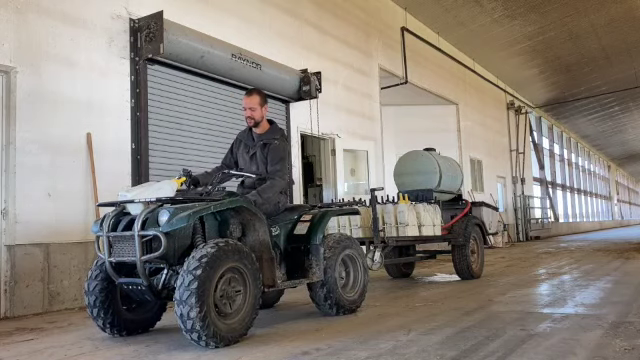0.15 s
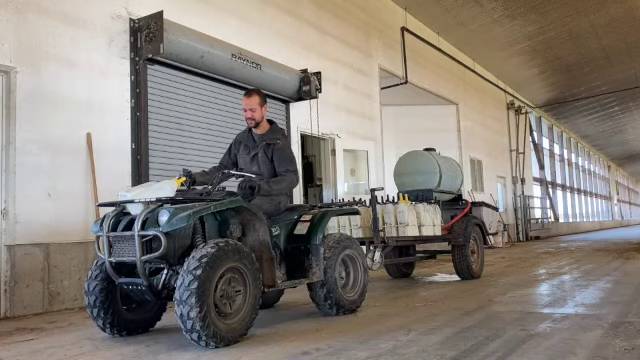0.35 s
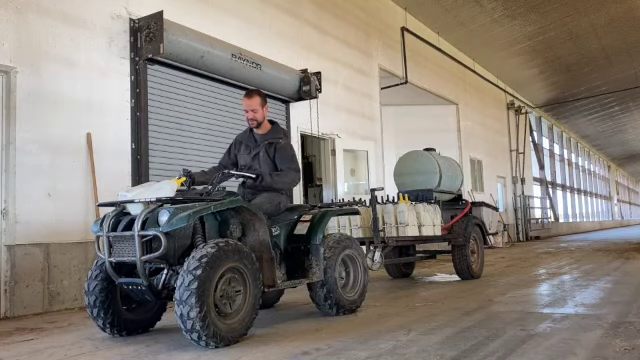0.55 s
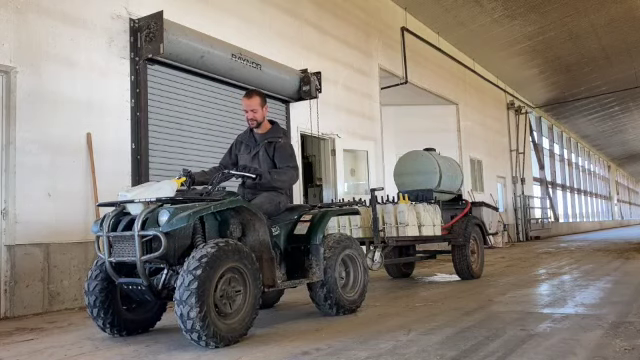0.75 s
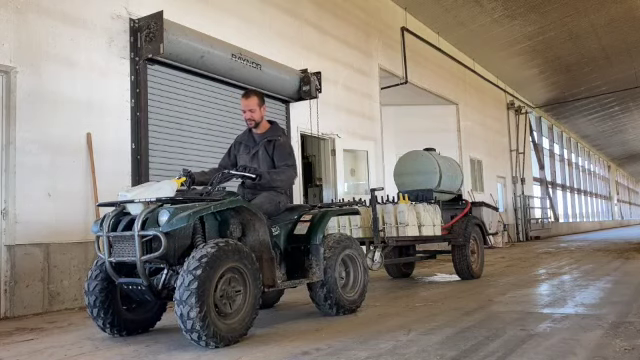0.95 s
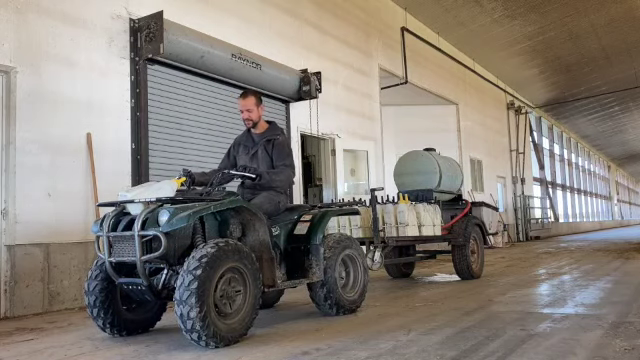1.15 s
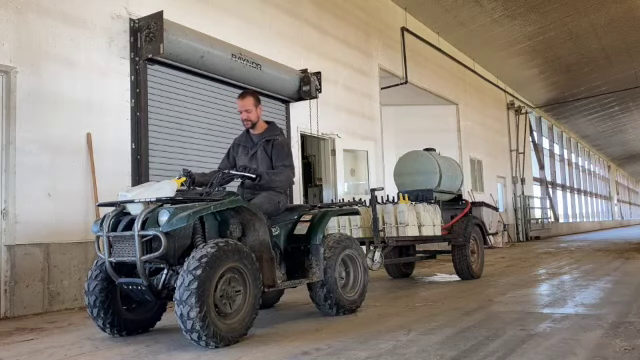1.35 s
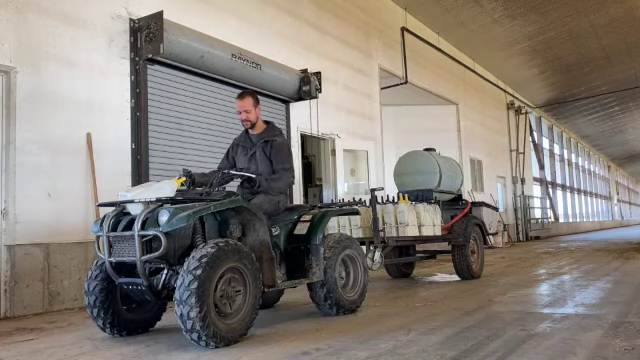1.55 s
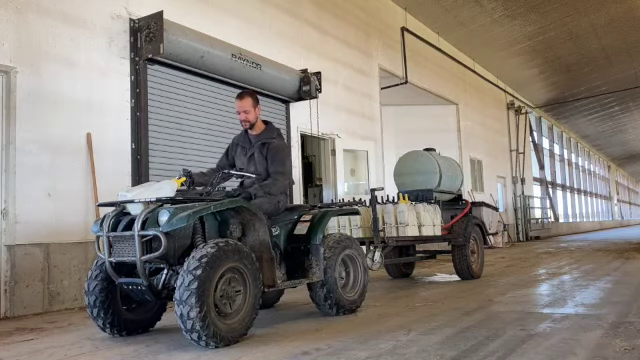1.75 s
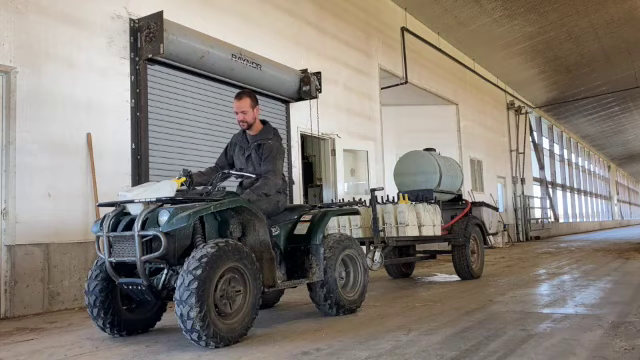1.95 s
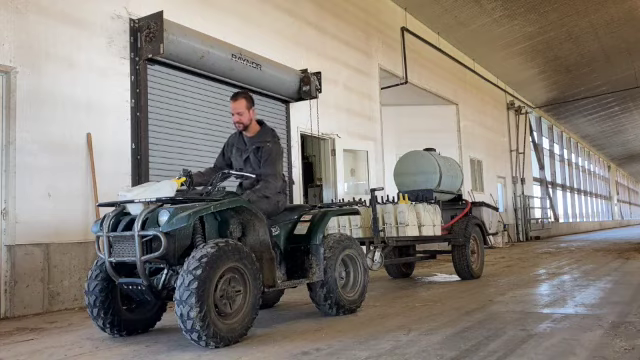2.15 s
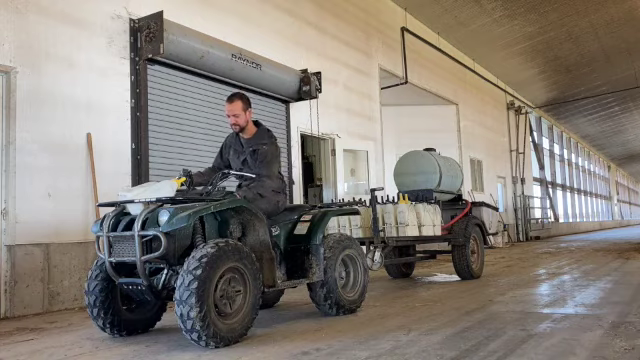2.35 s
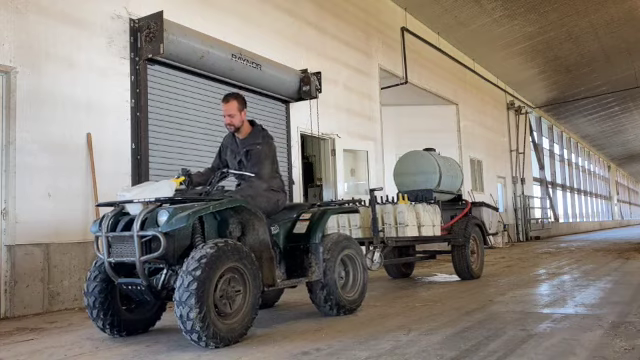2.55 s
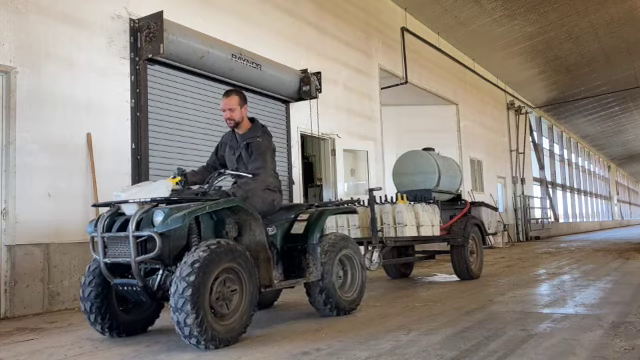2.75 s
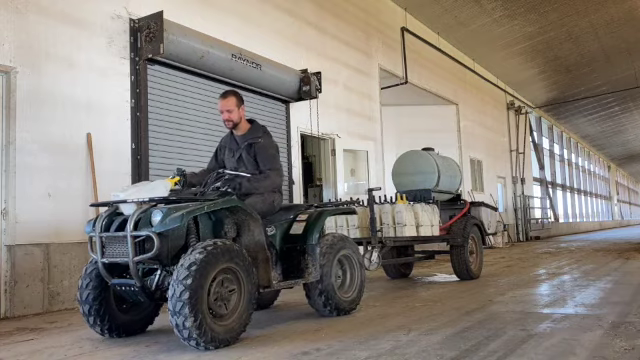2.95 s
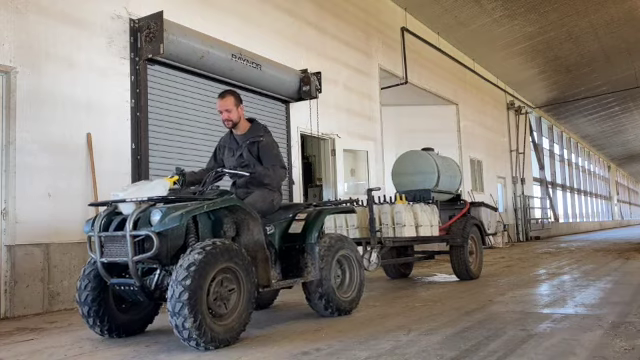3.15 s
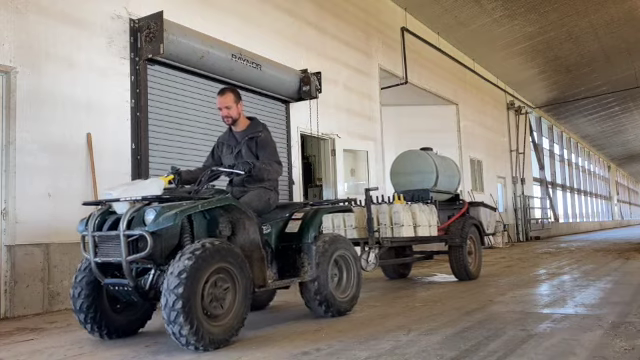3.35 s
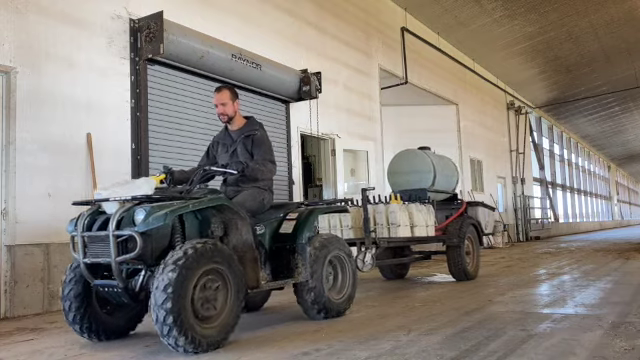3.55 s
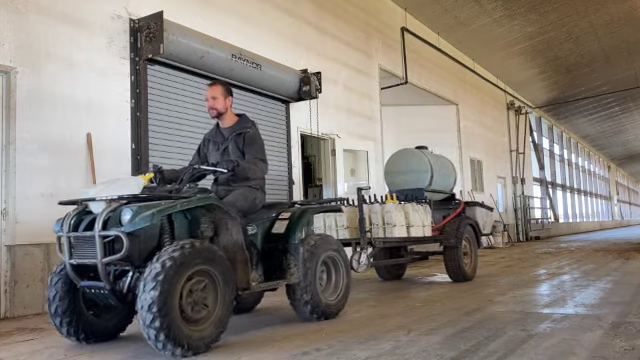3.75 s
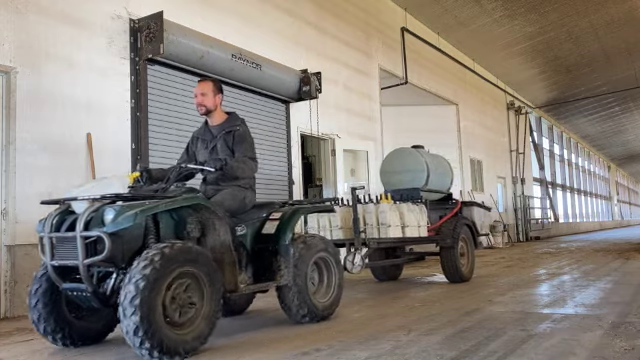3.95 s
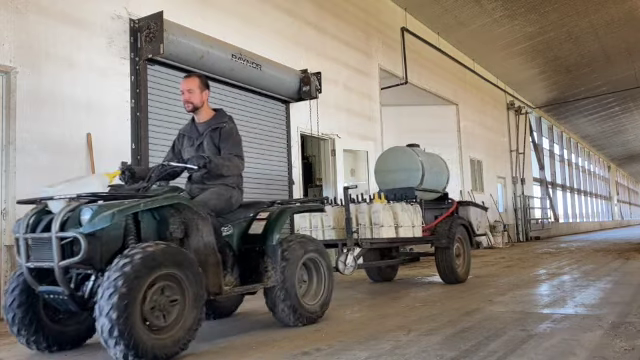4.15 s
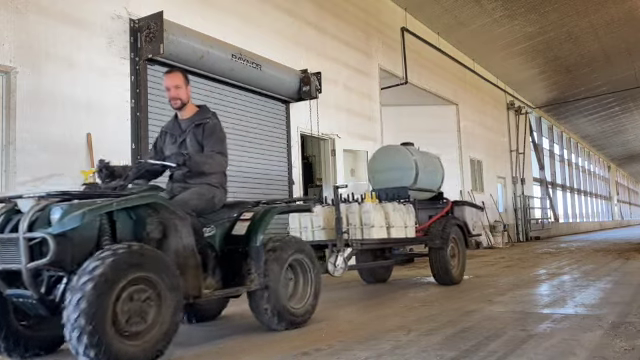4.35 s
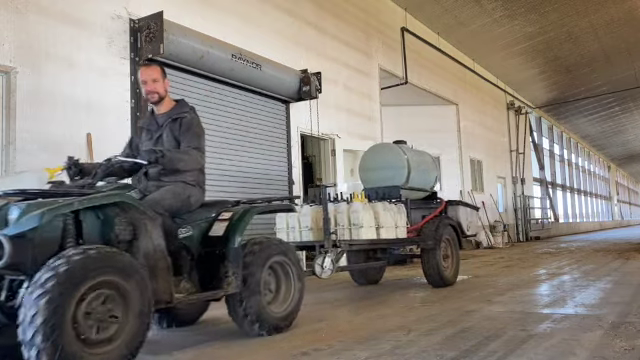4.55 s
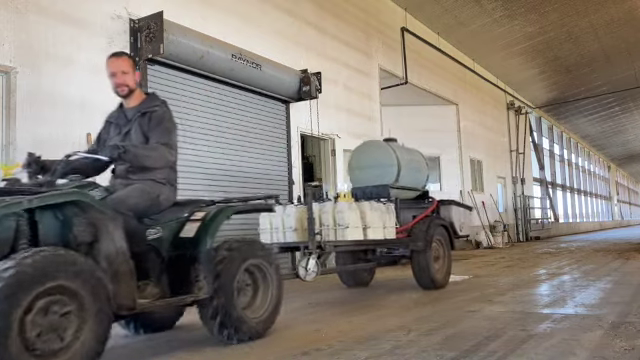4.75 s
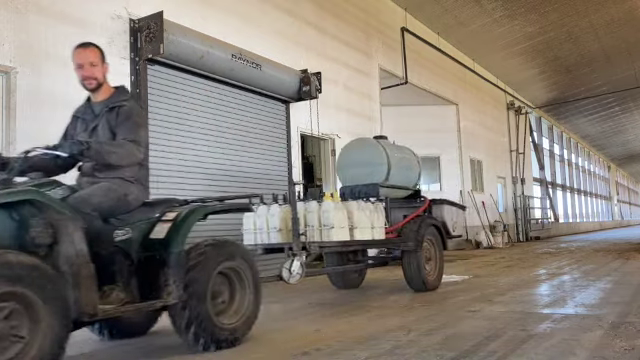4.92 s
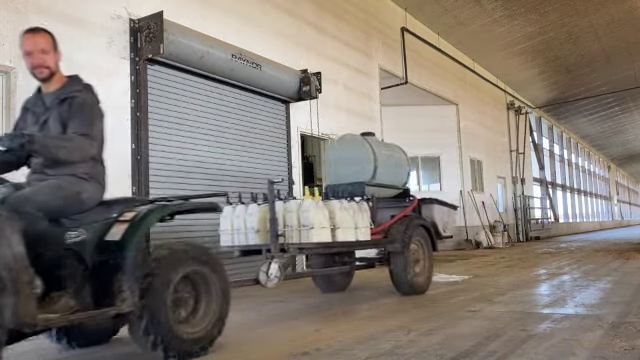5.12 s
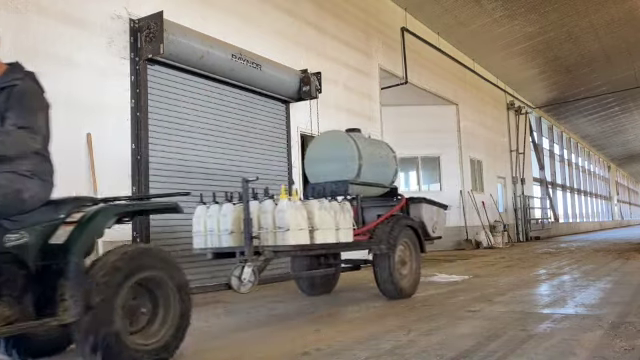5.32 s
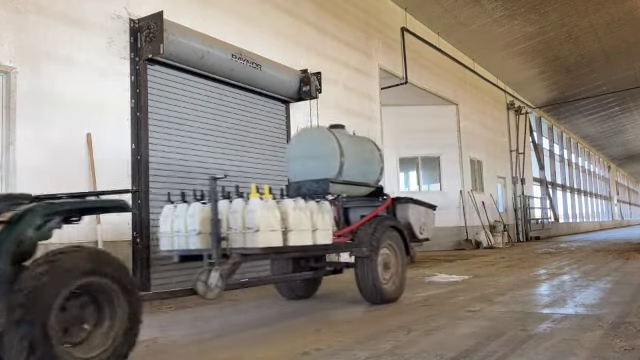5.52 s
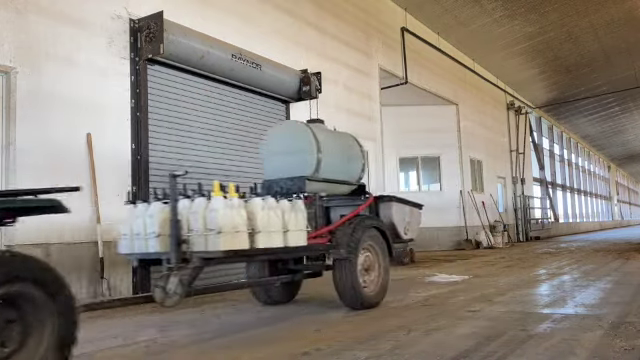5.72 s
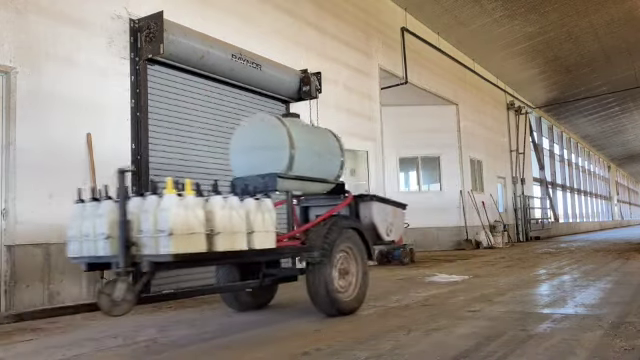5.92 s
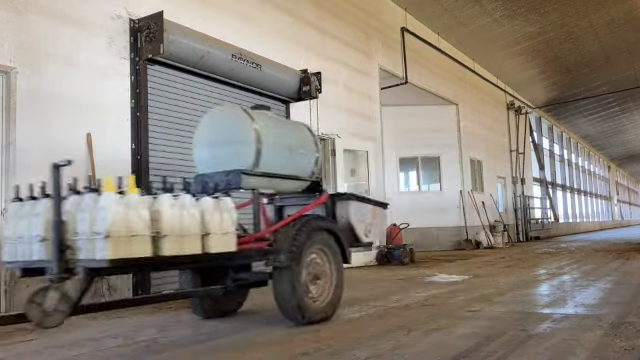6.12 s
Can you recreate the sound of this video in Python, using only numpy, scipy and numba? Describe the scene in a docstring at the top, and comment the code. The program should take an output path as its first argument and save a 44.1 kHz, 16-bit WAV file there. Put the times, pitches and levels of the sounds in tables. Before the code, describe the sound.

Inside a long concrete barn, heard by a nearby stereo phone, a low wavering machinery hum and soft air rush open the scene. Metallic frame knocks fall around 0.2 and 0.5-0.6 s. At 0.9 s a bright relay click is followed by a short, rough starter grind, swelling near 1.0 and letting go by 1.15 as a small single-cylinder engine catches. It flares until about 1.4 with gear chatter and several hard clacks, then sinks to a slow, lumpy, thumping idle with ticking valves and a few knocks, almost stalling near 2.7. Two strong clunks at 2.8-2.9 mark the load coming on. The boomy exhaust firms to about twenty beats per second, rising past thirty by 6 s. Valve ticking gives way to casing clatter and hiss as the flank passes after 4 s; around 5.6 the tail passes, the tailpipe rings out and trailer rattle peaks near 5.9, leaving leftward.

```python
"""Long concrete barn: a single-cylinder four-stroke quad is started, idles, and pulls a trailer past a phone.
First come humming machinery (shaped noise), frame knocks (struck modes), relay click and starter grind.
Each firing pops, rings the tailpipe and swells in the silencer (pulses through resonators).
Valves tick (filtered clicks); casing and gas throb each cycle (shaped noise).
The trailer rattles (random knocks on resonances)."""
import sys
import numpy as np
from scipy import signal
from scipy.fft import rfft, irfft, next_fast_len
from scipy.io import wavfile
from scipy.ndimage import uniform_filter1d
from numba import njit

SR = 44100
rng = np.random.default_rng(int(sys.argv[2]) if len(sys.argv) > 2 else 0)


def attenuation_scalar(level_db):
    """Turn a level in dB into a linear amplitude multiplier (20 dB per decade)."""
    decades = np.asarray(level_db, float) / 20
    return 10 ** decades


def wav_out(sig):
    """Save sig, one row per channel (or a flat mono array), as 16-bit PCM at SR to the path in sys.argv[1]."""
    wavfile.write(sys.argv[1], SR, np.round(np.clip(np.atleast_2d(sig).T, -1, 1) * 32767).astype(np.int16))


N = 272538
SIZE = next_fast_len(N)
T = np.arange(N) / SR
F = np.maximum(np.fft.rfftfreq(SIZE, 1 / SR), 1)


def unit(x):
    """Scale to rms 1."""
    return x / np.sqrt(np.mean(x ** 2))


def curves(table):
    """Columns of a table, interpolated over time."""
    s, *columns = np.transpose(table)
    return [np.interp(T, s, c) for c in columns]


@njit
def svf(x, hz, width_hz):
    """State-variable band-pass with a moving centre, gain 1 there."""
    y, b, l = np.empty(len(x)), 0., 0.
    for i in range(len(x)):
        g, k = np.tan(np.pi * hz[i] / SR), width_hz / hz[i]
        v = (b + g * (x[i] + 1e-18 - l)) / (1 + g * (g + k))
        b, l, y[i] = 2 * v - b, l + 2 * g * v, k * v
    return y


def band(x, hz, width_hz):
    """Band-pass at a fixed or moving centre."""
    return svf(x, hz + np.zeros(N), float(width_hz))


def noise(points=(), peaks=()):
    """Two unrelated noises, rms 1, coloured by (Hz, dB) points or (Hz, width Hz, dB) resonances."""
    if points:
        hz, db = np.transpose(points)
        gain = attenuation_scalar(np.interp(np.log(F), np.log(hz), db))
    else:
        power = sum(attenuation_scalar(db) ** 2 / (1 + ((F - hz ** 2 / F) / w) ** 2) ** 2 for hz, w, db in peaks)
        gain = np.sqrt(power)
    white = rng.standard_normal((2, SIZE))
    return unit(irfft(gain * rfft(white), SIZE)[:, :N])


def walk(rate_hz):
    """Random levels, rms 1, held 1 / rate_hz s and slewed twice."""
    k = int(SR / rate_hz)
    held = np.repeat(rng.standard_normal(N // k + 1), k)
    return unit(uniform_filter1d(uniform_filter1d(held, k), k)[:N])


def ring(modes, start_s):
    """Struck modes (Hz, dB, t60 s), each a little detuned from blow to blow."""
    out, first = np.zeros(N), int(start_s * SR)
    t = T[:min(SR // 3, N - first)]
    detune = 1 + 0.034 * rng.standard_normal(len(modes))
    for (hz, db, t60_s), d in zip(modes, detune):
        decay = np.exp(-np.log(1000) * t / t60_s)
        out[first:first + len(t)] += attenuation_scalar(db) * np.sin(2 * np.pi * hz * d * t) * decay
    return out / np.sqrt(len(modes))


def scatter(x, t60_s, wet_db):
    """Near sound plus its scattered echo off floor and walls, as two unrelated versions."""
    t = T[:int(t60_s * SR)]
    tails = rng.standard_normal((2, len(t))) * np.exp(-np.log(1000) * t / t60_s)
    tails *= attenuation_scalar(wet_db) / np.sqrt(np.sum(tails[0] ** 2))
    direct = x * np.array([[1], [0]])
    return direct + signal.fftconvolve(x[None], tails, axes=1)[:, :N]


def peak(at_s, top_db, rise_db_per_s, fall_db_per_s):
    """Level in dB that climbs to one moment and falls away after it."""
    return top_db - np.where(T < at_s, rise_db_per_s * (at_s - T), fall_db_per_s * (T - at_s))


# barn machinery; swells, then drops just before the engine catches: [t/s, hum level/dB, air level/dB]
MACHINERY_LEVELS = [(0, -26.5, -25.5), (.9, -26, -27), (1.06, -25.5, -21.5), (1.095, -16, -17),
                    (1.12, -30, -37), (1.2, -44, -39), (6.18, -27, -31)]
# hum resonances: [f/Hz, width/Hz, level/dB]
HUM_PEAKS = [(54, 5, -5), (66, 5, 0), (124, 6, -4), (180, 8, -9), (4150, 1000, -35), (3871, 15, -30)]
# air rush spectrum: [f/Hz, level/dB]
AIR_SPECTRUM = [(15, -35), (30, -16), (70, 1), (185, -13.5), (416, -17), (900, -23), (2300, -31.5),
                (3200, -34), (4200, -43), (5500, -42.5), (9000, -46.5), (16000, -58.5)]


def barn():
    """Machinery: narrow noise bands make a wavering hum, broad noise a rush of air."""
    hum_db, air_db = curves(MACHINERY_LEVELS)
    hum = attenuation_scalar(hum_db) * noise(peaks=HUM_PEAKS)
    air = attenuation_scalar(air_db + 0.64 * walk(7.5)) * noise(points=AIR_SPECTRUM)
    return hum + air


CRUNCH_DB, CRUNCH_T60_S = -13, 0.079  # loose parts jolted by a blow; dB relative to the blow
# blows on the frame: [t/s, level/dB, f/Hz that rings most, thud level/dB]
FRAME_BLOWS = [(.188, -14, 2220, -39), (0.198, -44, 1500, -7), (.213, -27, 2200, -8),
               (0.237, -37, 1500, -14), (.45, -22, 560, -38), (.5, -23, 560, -33), (.577, -21, 860, -26),
               (0.619, -24, 860, -32), (1.253, -15.5, 1090, -37), (1.303, -12, 1320, -9),
               (1.35, -18, 1510, -10.5), (1.397, -16, 2000, -38), (1.44, -19.5, 1500, -25),
               (2.056, -25, 1700, -28), (2.13, -23, 1700, -54), (2.288, -31.5, 2560, -38),
               (2.43, -20, 1550, -36), (2.826, -15, 920, -30), (2.886, -12.5, 940, -16),
               (6.031, -37, 860, -21)]
# frame modes: [f/Hz, level/dB, t60/s]
FRAME_MODES = [(560, 10.5, 0.15), (860, 4, 0.097), (1098, 11, 0.053), (1300, 5, 0.058), (1700, 8, 0.023),
               (2200, 10, 0.023), (2640, 1, 0.012), (3540, 1, 0.042), (4400, 3, 0.027), (6600, 5, 0.014),
               (7750, 11, 0.0099), (10200, 6, 0.0078)]
# low frame modes: [f/Hz, level/dB, t60/s]
THUD_MODES = [(121.2, -3, .13), (192, 4, 0.09), (277, -4.5, 0.22), (329.5, -7, 0.1), (420, -14.5, 0.041)]
# broad metal noise, also under starter and casing: [f/Hz, level/dB]
METAL_SPECTRUM = [(250, -30), (450, -8), (700, 0.5), (1500, 5), (3000, -7.5), (5000, -10.5), (8000, -53)]


def blows():
    """Knocks and clacks: modes near the favoured pitch ring most, over a low thud and a short crunch."""
    hits = 0
    grit = noise(points=METAL_SPECTRUM)[0] * attenuation_scalar(3.3 * walk(300))
    for s, db, top_hz, thud_db in FRAME_BLOWS:
        struck = [(hz, mode_db - 7 * abs(np.log2(hz / top_hz)), t60_s)
                  for hz, mode_db, t60_s in FRAME_MODES]
        decay = (T > s) * np.exp(-np.log(1000) * np.abs(T - s) / CRUNCH_T60_S)
        crunch = attenuation_scalar(CRUNCH_DB) * decay * grit
        hits = hits + attenuation_scalar(db) * (ring(struck, s) + crunch) - attenuation_scalar(thud_db) * ring(THUD_MODES, s)
    return scatter(hits, 0.18, -0.057)


RELAY_S, RELAY_DB = .921, -7.5
GRIND_PEAK_S, GRIND_FREE_S, GRIND_DB, GRIND_TREBLE_DB = 0.99, 1.12, -14.5, -33.5
GRIND_RISE_DB_PER_S, GRIND_FALL_DB_PER_S, TREBLE_SLOPE_SHARE = 270, 146, 0.25
CHATTER_RISE_DB_PER_S, CHATTER_FALL_DB_PER_S = 1500, 397
PINION_S, PINION_DB, PINION_HZ, PINION_SAG_HZ_PER_S = 1.14, -21, 1500, 9400
PINION_RISE_DB_PER_S, PINION_FALL_DB_PER_S, PINION_LENGTH_S = 1500, 150, .06
# relay modes: [f/Hz, level/dB, t60/s]
RELAY_MODES = [(1780, 0, 0.02), (3410, 10, 0.018), (6070, -9, 0.027), (6570, -3, 0.023), (7700, 0, 0.016),
               (10800, 2.5, 0.0089)]
# starter body resonances: [f/Hz, width/Hz, level/dB]
STARTER_PEAKS = [(607, 184, 4.5), (1080, 300, -3), (1380, 130, 4), (1667, 70, 3.5), (2090, 740, -2.5),
                 (2740, 320, -2), (3200, 360, -7), (3970, 210, -29)]
# gear chatter as the engine overruns it: [t/s, body level/dB, treble level/dB]
GEAR_CHATTER = [(1.138, -32, -37), (1.201, -29, -28.5), (1.27, -28.5, -31), (1.325, -24.5, -29),
                (1.371, -27, -31.5), (1.418, -26, -33.5), (1.47, -40, -45)]
# hiss, as starter treble and as engine gas: [f/Hz, level/dB]
HISS_SPECTRUM = [(1500, -28), (4000, -5), (6000, -2.5), (9000, -3.5), (12000, -5), (16000, -16)]


def starter():
    """Relay snaps shut, motor grinds on the ring gear and lets go, freed pinion runs down."""
    swell_db = peak(GRIND_PEAK_S, 0, GRIND_RISE_DB_PER_S, GRIND_FALL_DB_PER_S)
    swell_db = np.where(T > RELAY_S, swell_db, -200)
    swell_db = swell_db - 200 * (T > GRIND_FREE_S)
    body = attenuation_scalar(GRIND_DB + swell_db)
    treble = attenuation_scalar(GRIND_TREBLE_DB + TREBLE_SLOPE_SHARE * swell_db)
    for s, db, treble_db in GEAR_CHATTER:
        burst = attenuation_scalar(peak(s, 0, CHATTER_RISE_DB_PER_S, CHATTER_FALL_DB_PER_S))
        body = body + attenuation_scalar(db) * burst
        treble = treble + attenuation_scalar(treble_db) * burst
    rough = attenuation_scalar(1.55 * walk(250))
    grind = noise(peaks=STARTER_PEAKS) + attenuation_scalar(-5.0) * noise(points=METAL_SPECTRUM)

    pinion_hz = PINION_HZ - PINION_SAG_HZ_PER_S * np.clip(T - PINION_S, 0, PINION_LENGTH_S)
    spin = attenuation_scalar(peak(PINION_S, PINION_DB, PINION_RISE_DB_PER_S, PINION_FALL_DB_PER_S))
    spin = spin * (T < PINION_S + PINION_LENGTH_S)
    pinion = np.array([unit(band(white, pinion_hz, 260) + 0.4 * band(white, 2 * pinion_hz, 450))
                       for white in rng.standard_normal((2, N))])

    relay = scatter(attenuation_scalar(RELAY_DB) * ring(RELAY_MODES, RELAY_S), .12, -22)
    return relay + spin * pinion + rough * (body * grind + treble * noise(points=HISS_SPECTRUM))


FIRST_FIRING_TURNS = .48  # cycles from catching to first firing
# engine speed: [t/s, firing rate f/Hz]
FIRING_RATE = [(1.15, 8.5), (1.3, 18.77), (1.4, 24.13), (1.54, 16.74), (1.6, 19.06), (1.66, 13.33),
               (2.0, 12.21), (2.2, 15.16), (2.73, 10.53), (2.88, 16.69), (2.96, 18.58), (3.95, 19.9),
               (4.1, 21.31), (4.8, 22.6), (5.2, 25.17), (5.4, 27.23), (5.9, 30.56), (6.18, 30.96)]


def crank():
    """Position in four-stroke cycles, one firing each, 0 at the first firing."""
    rate_hz, = curves(FIRING_RATE)
    return np.cumsum(rate_hz * (T >= FIRING_RATE[0][0])) / SR - FIRST_FIRING_TURNS


def once_a_cycle(turns, at, scatter_db):
    """One click per cycle at a fixed crank position, each of its own strength."""
    cycle = np.floor(turns - at)
    size = attenuation_scalar(scatter_db * rng.standard_normal(N // 100))
    return np.diff(cycle, prepend=cycle[0]) * size[np.maximum(cycle, 0).astype(int)]


PULL_S, PULL_RISE_S = 2.8, 0.15


def pulling():
    """0 at idle, 1 once the engine has taken the load."""
    return np.clip((T - PULL_S) / PULL_RISE_S, 0, 1)


FRONT_PASSES_S, FLANK_PASSES_S, TAIL_PASSES_S, PASSING_S = 4.12, 4.6, 5.59, 0.1


def passed(at_s):
    """0 to 1 as a part of the quad swings past the phone."""
    return 1 / (1 + np.exp((at_s - T) / PASSING_S))


CRUISE_HZ = 20  # firing rate at which the layer levels hold
# how hard each charge burns; hunts at idle, nearly stalls before the pull: [t/s, effort level/dB]
BURN_EFFORT = [(1.19, -1.5), (1.25, -2), (1.35, -3), (1.45, 0), (1.65, -6), (1.95, -8), (2.1, -1.5),
               (2.2, -4), (2.35, -5), (2.62, -7), (2.74, -7), (2.8, -1), (2.9, 1), (3.3, -2), (4.2, 1.5),
               (4.8, 1.5), (5.2, -1.5), (6.18, 0)]
# by layer: [level/dB, dB per octave of speed, dB per dB of effort, gain/dB once the tail has passed]
ENGINE_LAYERS = {"boom": (-11, 0.1, 1.0, 0.1), "pop": (-21, 7, .1, 0.1), "ring": (-33, 2.5, .1, 14),
                 "shake": (-30, 18, .1, 0.1), "clatter": (-32, 10, .2, -1.5), "rattle": (-34, 10, .3, 4),
                 "hiss": (-41.5, 11, .3, 2.5), "rumble": (-32, 3, .7, -1.5), "tick": (-42, 4, .3, -6)}


def engine(*names):
    """Layer gains from speed, effort and which end of the quad faces the phone."""
    octaves = np.log2(curves(FIRING_RATE)[0] / CRUISE_HZ)
    effort_db, = curves(BURN_EFFORT)
    running, tail = T > BURN_EFFORT[0][0], passed(TAIL_PASSES_S)
    return [running * attenuation_scalar(db + speed_db * octaves + share * effort_db + tail_db * tail)
            for db, speed_db, share, tail_db in (ENGINE_LAYERS[name] for name in names)]


BOOM_IDLE_HZ, BOOM_PULL_HZ = 83.3, 89.47  # hotter gas under load raises the silencer's note
# tailpipe resonances: [f/Hz, width/Hz, level/dB]
TAILPIPE_PEAKS = [(185, 15.4, -15), (269, 33.5, 2), (305.8, 23, 3.5), (375, 76, -14)]


def steady(x):
    """Level out to rms 1 over a quarter second."""
    return x / np.sqrt(uniform_filter1d(x ** 2, SR // 4) + 1e-12)


def exhaust(turns):
    """Short dull pop, ring in the tailpipe, boom swelling through three coupled silencer chambers."""
    boom_gain, pop_gain, ring_gain, shake_gain = engine("boom", "pop", "ring", "shake")
    load = pulling()
    firing = once_a_cycle(turns, 0, 0.27)
    t = np.arange(-SR // 50, SR // 50 + 1) / SR
    pop_shape = np.cos(2 * np.pi * 205 * t) * np.exp(-(t / 0.0044) ** 2)
    pop = -signal.fftconvolve(firing, pop_shape, "same")
    valve_shape = np.exp(-((t + 0.00319) / 0.0016) ** 2)  # opens over a few ms
    blast = signal.fftconvolve(firing, valve_shape, "same")
    pipe = sum(attenuation_scalar(db) * band(band(blast, hz, w), hz, 2 * w) for hz, w, db in TAILPIPE_PEAKS)

    intake = signal.fftconvolve(once_a_cycle(turns, 0.452, 3.0), np.exp(-(t / 0.0011) ** 2), "same")
    gulp = blast + 0.31 * (1 - load) * intake
    boom_hz = BOOM_IDLE_HZ + (BOOM_PULL_HZ - BOOM_IDLE_HZ) * load
    boom = band(band(band(gulp, 0.905 * boom_hz, 10.9), boom_hz, 12.3), 1.063 * boom_hz, 18.1)
    high_chamber = band(band(band(blast, 109.6, 17.6), 108.2, 31), 108.2, 32)  # under load
    wide_chamber = band(band(blast, 137, 40), 137, 40)  # at idle
    boom = boom - 0.27 * load * high_chamber + 0.12 * (1 - load) * wide_chamber

    low = band(band(blast, 50, 30), 50, 30)
    shake = np.sqrt(2) * np.sin(2 * np.pi * 2 * turns)  # two crank turns per firing
    out = boom_gain * steady(boom) + pop_gain * steady(pop) + ring_gain * steady(pipe)
    return out + attenuation_scalar(-32.0) * steady(low) * (turns > 0) + shake_gain * load * shake


PUFF_DEPTH, PUFF_WIDTH_CYCLES = 1.1, .13  # hiss swell at each firing
PUFF_BLUR = 1.5  # power of speed by which echoes blur the swell
TICK_T60_S, TICK_ECHO_DB = .1, -5
TICK_LOAD_DB, TICK_SHADED_DB = 6.5, -6  # valves tick harder under load, then the body hides them
SIDE_TICK_HZ, SIDE_TICK_WIDTH_HZ, SIDE_TICK_DB = 2700, 1100, -42.5  # while the flank faces the phone
# casing resonances: [f/Hz, width/Hz, level/dB]
CASING_PEAKS = [(1338, 53, 8), (1737, 116, -6), (2370, 280, -3), (2686, 80, -3), (3090, 84, -22),
                (3830, 600, -10.5)]
# rattle resonances: [f/Hz, width/Hz, level/dB]
RATTLE_PEAKS = [(628, 137, -5.5), (860, 170, -8), (1092, 240, -2), (1214, 107, -1), (3140, 490, -13)]
# rough air in the pipe: [f/Hz, width/Hz, level/dB]
RUMBLE_PEAKS = [(197, 174, -1), (354, 66, 0), (469, 165, -6)]


def works(turns):
    """Casing noise and gas throb with the cycle; the valves tick softly late in it."""
    clatter_gain, rattle_gain, hiss_gain, tick_gain, rumble_gain = engine(
        "clatter", "rattle", "hiss", "tick", "rumble")

    def throb(at, width):
        """Bump once a cycle; position and width in cycles."""
        return np.exp(-(((turns - at + .5) % 1 - .5) / width) ** 2)

    casing = noise(peaks=CASING_PEAKS) + attenuation_scalar(5.5) * noise(points=METAL_SPECTRUM)
    casing_throb = 1 + 0.56 * throb(0.073, 0.16) + 0.51 * throb(0.62, 0.12)
    clatter = unit(casing * casing_throb * attenuation_scalar(0.5 * walk(40)))
    rattle_throb = 1 + 0.25 * throb(0.031, 0.11)
    rattle = unit(noise(peaks=RATTLE_PEAKS) * rattle_throb * attenuation_scalar(1.8 * walk(24.68)))
    puff_depth = PUFF_DEPTH * np.minimum(CRUISE_HZ / curves(FIRING_RATE)[0], 1) ** PUFF_BLUR
    puff = 1 + puff_depth * throb(0, PUFF_WIDTH_CYCLES) * attenuation_scalar(0.73 * walk(12))
    gas = unit(noise(points=HISS_SPECTRUM) * puff * attenuation_scalar(2.1 * walk(60)))
    rumble = noise(peaks=RUMBLE_PEAKS) * (1 + .5 * throb(0.072, 0.27))

    clicks = once_a_cycle(turns, .605, 1.5) + 0.4 * once_a_cycle(turns, 0.74, 4.)
    tick_hz = 1750 * (1 + 0.021 * walk(20))  # never struck twice alike
    tick = band(band(band(clicks, tick_hz, 620), tick_hz, 680), tick_hz, 620)
    tick = tick + .3 * band(band(clicks, 1350, 200), 1350, 300)
    tick_gain = tick_gain * attenuation_scalar(TICK_LOAD_DB * pulling() + TICK_SHADED_DB * passed(FRONT_PASSES_S))
    flank = band(once_a_cycle(turns, 0.62, 2.2), SIDE_TICK_HZ, SIDE_TICK_WIDTH_HZ)
    flank = unit(band(flank, SIDE_TICK_HZ, SIDE_TICK_WIDTH_HZ))
    flank_gain = attenuation_scalar(SIDE_TICK_DB) * passed(FRONT_PASSES_S) * (1 - passed(FLANK_PASSES_S))
    ticks = scatter(tick_gain * unit(tick) + flank_gain * flank, TICK_T60_S, TICK_ECHO_DB)

    return rumble_gain * rumble + clatter_gain * clatter + rattle_gain * rattle + hiss_gain * gas + ticks


TRAILER_DB, TRAILER_NEAR_DB, TRAILER_KNOCKS_PER_S, TRAILER_SCATTER_DB = -36.5, 5.5, 250, 4
TRAILER_NEAREST_S, TRAILER_NEAR_WIDTH_S = 5.92, 0.25
# load and hitch resonances: [f/Hz, width/Hz, level/dB]
TRAILER_PEAKS = [(850, 57, 0.5), (930, 42, -7), (1244, 55, -4), (1660, 99, -11), (2296, 120, -2),
                 (3210, 170, -1)]


def trailer():
    """Loose knocks at random moments ring load and hitch, each part struck on its own."""
    rattle = 0
    for hz, width_hz, db in TRAILER_PEAKS:
        chance = rng.random((2, N))
        strength = attenuation_scalar(-TRAILER_SCATTER_DB * np.log(chance[1] + 1e-9))
        knocks = (chance[0] < TRAILER_KNOCKS_PER_S / SR) * strength
        rattle = rattle + attenuation_scalar(db) * unit(band(band(knocks, hz, width_hz), hz, 2 * width_hz))
    near = np.exp(-((T - TRAILER_NEAREST_S) / TRAILER_NEAR_WIDTH_S) ** 2)
    gain = attenuation_scalar(TRAILER_DB + TRAILER_NEAR_DB * near) * passed(FRONT_PASSES_S)
    return scatter(gain * unit(rattle), .15, -2.5)


BARN_T60_S, BARN_ECHO_DB = .5, -14
PAN_DB = 1.3  # the quad leaves to the left
# two microphone ports: [f/Hz, likeness -1..1, left minus right level/dB, lead of left/half cycles]
PORT_PAIR = [(100, .998, 0, 0), (170, .97, .5, 0), (260, .72, 4, 0), (360, .65, 5, -.1),
             (600, .6, -.5, -.9), (860, .7, 0, -1.7), (1400, .7, .5, -.5), (2300, .52, 2, -.1),
             (3100, .4, 2, .2), (6800, .7, 1, 0), (9000, .93, 0, -1), (11200, .93, 0, -2),
             (13400, .93, 0, -3), (15600, .93, 0, -4)]


def scene():
    """All sources, spread over two ports that agree in the bass and differ above."""
    turns = crank()
    mix = barn() + blows() + starter() + works(turns) + trailer()
    mix = mix + scatter(exhaust(turns), BARN_T60_S, BARN_ECHO_DB)
    a, b = rfft(mix, SIZE)
    hz, *columns = np.transpose(PORT_PAIR)
    like, tilt_db, lead = (np.interp(np.log(F), np.log(hz), c) for c in columns)
    like = np.clip(like, -.99, 1)
    mid, side = np.sqrt((1 + like) / 2) * a, np.sqrt((1 - like) / 2) * b
    turn = np.exp(.5j * np.pi * lead)
    left = (mid + side) * attenuation_scalar(tilt_db / 2) * turn
    right = (mid - side) * attenuation_scalar(-tilt_db / 2) / turn
    pair = irfft(np.array([left, right]), SIZE)[:, :N]
    return pair * attenuation_scalar(np.array([[.5], [-.5]]) * PAN_DB * passed(TAIL_PASSES_S))


def band_limit(x):
    """A steep low-pass at the top of the band."""
    return signal.sosfilt(signal.butter(12, 16800, fs=SR, output="sos"), x)


def record(dry):
    """The phone drops the deepest bass and rounds the loudest peaks."""
    high_pass = signal.butter(2, 28, "high", fs=SR, output="sos")
    mix = np.tanh(1.024 * signal.sosfilt(high_pass, dry)) / 0.9
    return band_limit(mix)


dry = scene()
out = record(dry)
wav_out(out)
```